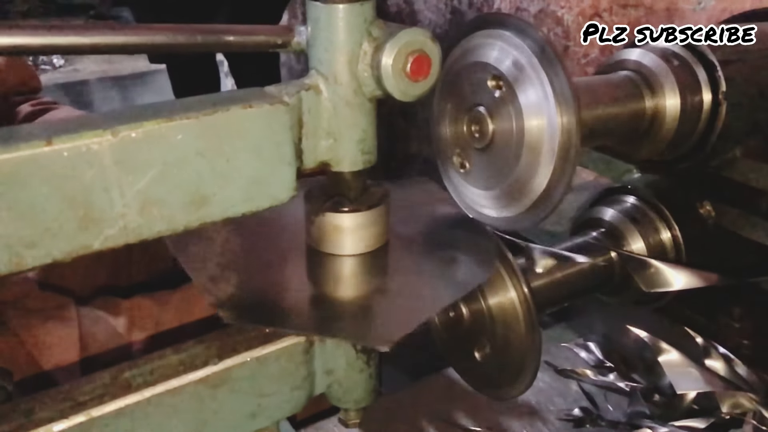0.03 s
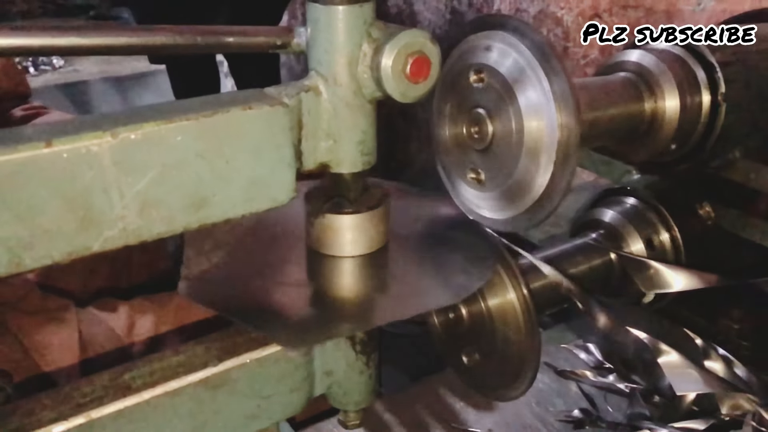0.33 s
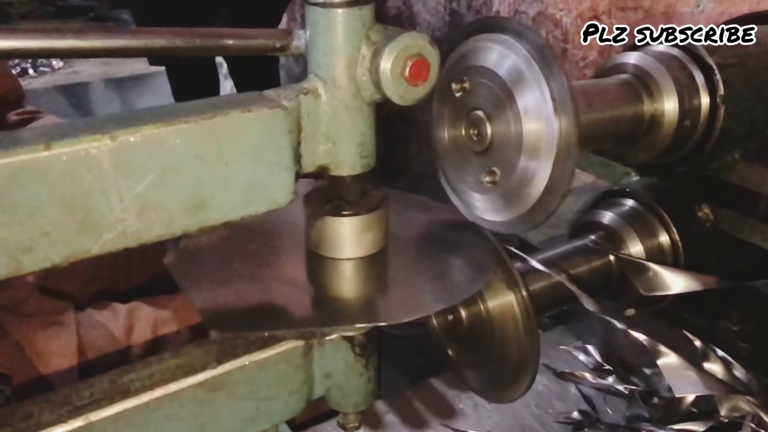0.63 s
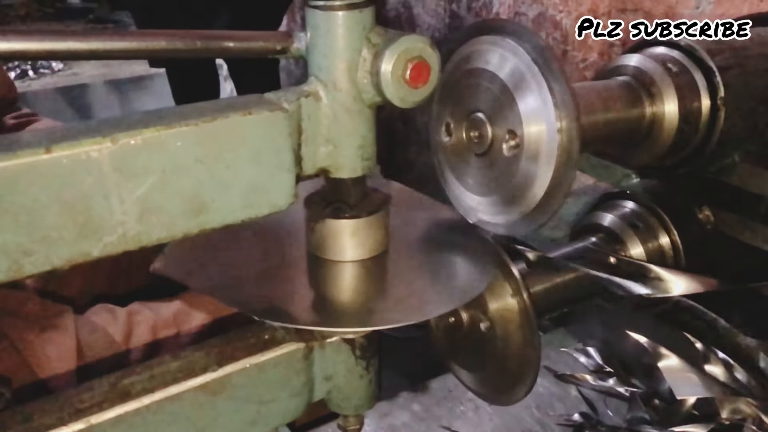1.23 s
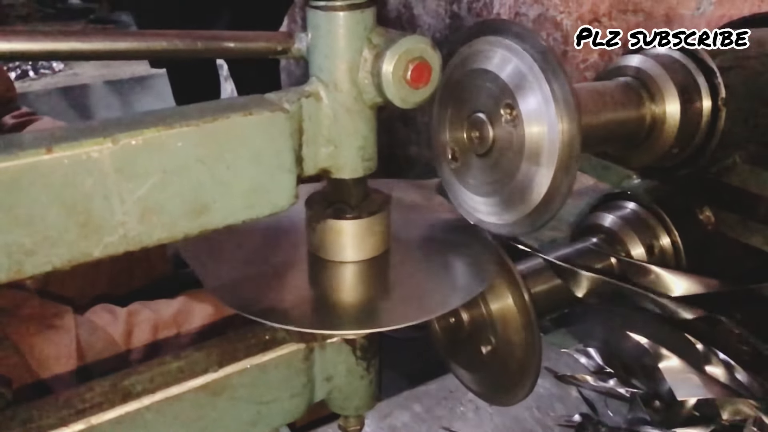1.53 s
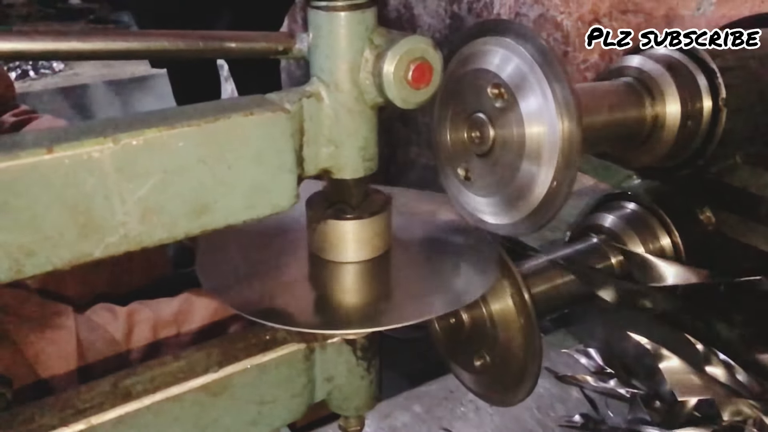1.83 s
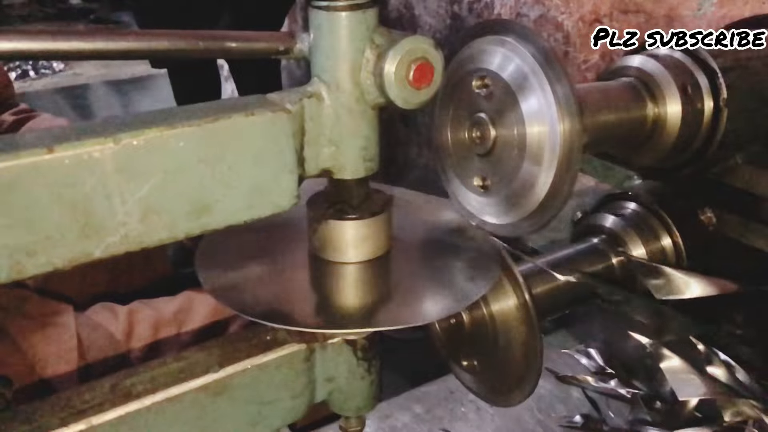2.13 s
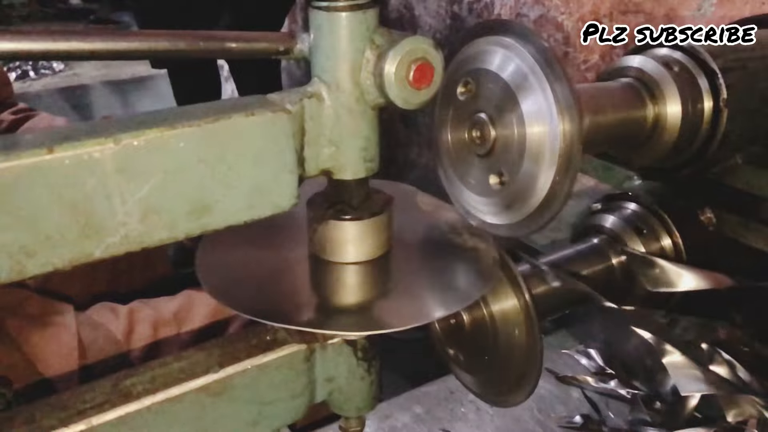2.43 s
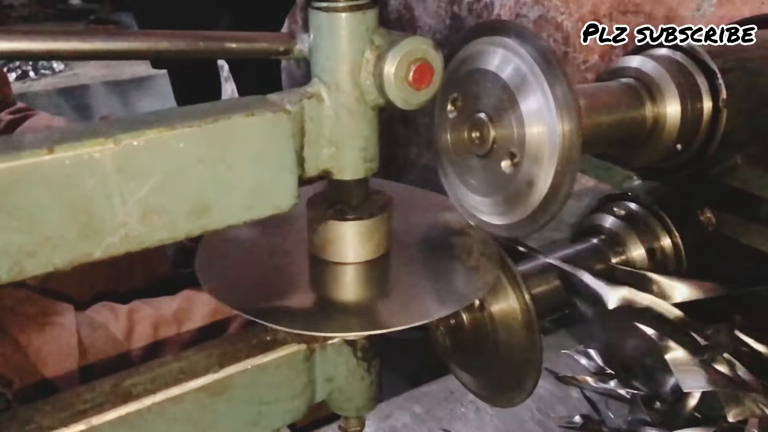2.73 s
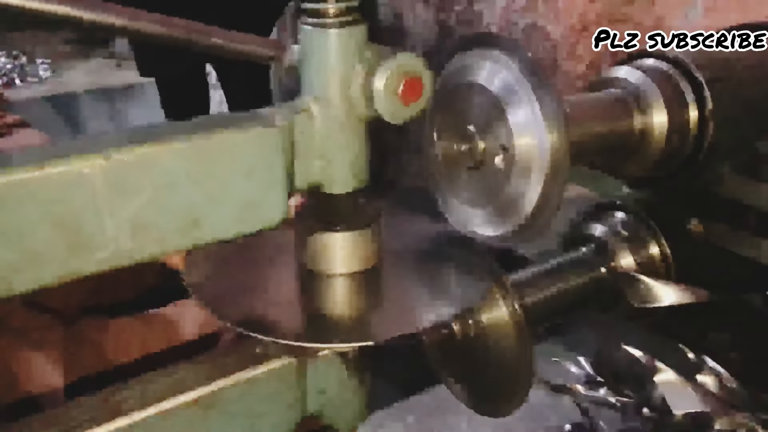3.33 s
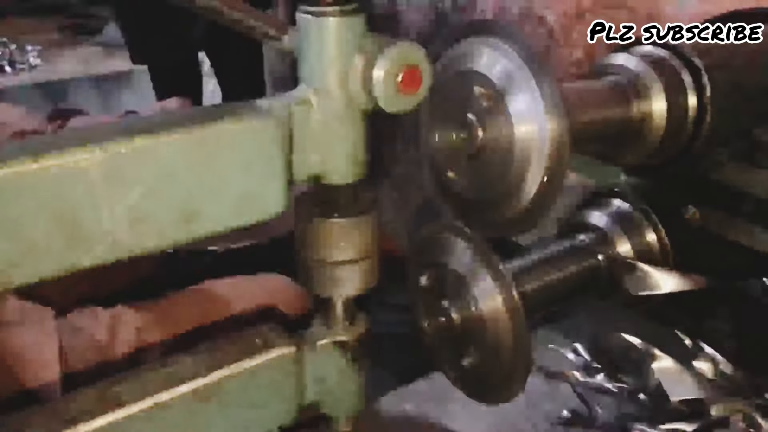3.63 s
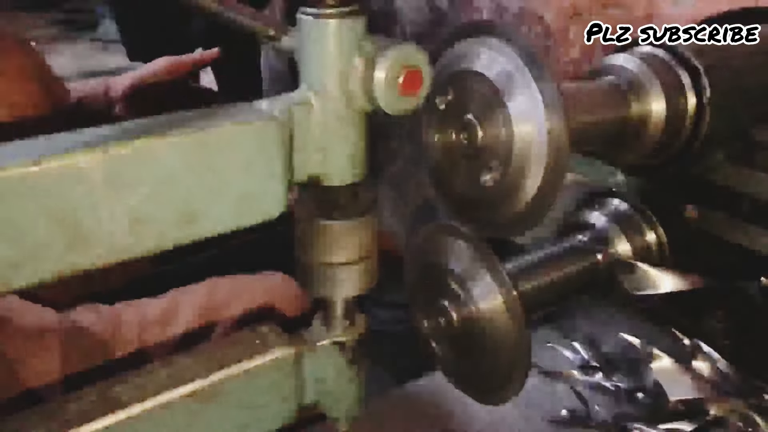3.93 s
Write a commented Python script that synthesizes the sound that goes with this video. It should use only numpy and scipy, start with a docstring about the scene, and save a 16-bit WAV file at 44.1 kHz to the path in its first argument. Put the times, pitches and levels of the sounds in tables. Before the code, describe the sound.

A metal cutting machine rumbles and groans softly in slow motion as the sheet cracks. Near the end it speeds up into a much louder rattling hum, with sharp metallic snaps, scrapes, knocks and a falling offcut.

```python
"""A deep, quiet rumble and groan come first: a rotary shear trims a sheet-metal disc in eightfold slow
motion, stepping up to full speed and level at about three seconds. The drive hums and a loose part
rattles; the sheet snaps, rings and scrapes between the chattering wheels; the disc knocks against its
clamp, and the offcut crashes on the scrap pile. Starts and level curves are in listening time; pitches,
lengths and decays are those at full speed. Levels in dB are relative."""
import sys
import numpy as np
from scipy import signal
from scipy.fft import rfft, irfft, next_fast_len
from scipy.io import wavfile
from scipy.ndimage import map_coordinates

SR = 44100
rng = np.random.default_rng(int(sys.argv[2]) if len(sys.argv) > 2 else 0)


def digitize_waveform(pressure):
    """Quantize a signal to 16-bit integers and store it at the path in sys.argv[1].

    Rows of a 2-D input are taken as channels; values are limited to [-1, 1].
    """
    field = np.atleast_2d(pressure).T
    bounded = np.clip(field, -1, 1)
    quanta = np.round(bounded * 32767).astype(np.int16)
    wavfile.write(sys.argv[1], SR, quanta)


N = 176400

# Snaps of the sheet. Each row: start in seconds, level in dB, decay in seconds, tilt in dB per octave,
# level of the ring in dB.
SNAPS = [(1.031, -32.5, 0.0034, -5.5, -5.5), (1.484, -29, 0.0014, 2.5, 2.5), (1.702, -29, 0.0026, 3.5, 1),
         (1.843, -32.5, 0.0013, -0.5, 0), (1.989, -37, .003, -2, -1), (2.085, -39, .002, 5.5, -6),
         (2.531, -45.5, .002, -2, -4), (3.015, -39, 0.011, -3.5, -3), (3.05, -40, .004, 0.5, 10),
         (3.067, -34.5, 0.0038, 1, 10), (3.089, -37.5, 0.0043, 1.5, -3), (3.198, -37, 0.0035, -2, -4),
         (3.223, -41.5, .006, 0, 0), (3.316, -38, 0.0073, -0.5, 0)]
SNAP_RISE_S, SNAP_TAIL_DB, SNAP_TAIL_S = 0.0011, -12, 0.017
# Scrapes of the cut edge. Each row: start and length in seconds, level in dB, tilt in dB per octave.
SCRAPES = [(1.584, .004, -47, -1.5), (1.662, 0.069, -39.5, -2), (2.459, 0.091, -48.5, -3.5),
           (3.028, 0.05, -38.5, 0), (3.205, 0.041, -38.5, 0.5), (3.324, .06, -44, 1),
           (3.406, 0.075, -53, -3), (3.497, .065, -41.5, 2.5), (3.933, 0.044, -46, -6)]
SCRAPE_RISE_S, SCRAPE_FADE_S, SCRAPE_GRIT_DB = 0.0049, 0.028, 1.5
# Knocks on the clamp. Each row: start in seconds, level in dB, pitch in Hz.
KNOCKS = [(3.086, -35.5, 616), (3.104, -30.5, 600), (3.544, -32.5, 555)]
KNOCK_RISE_S, KNOCK_DECAY_S = 0.0034, 0.014
# Modes of the clamped disc. Each row: multiple of the pitch, level in dB.
DISC_MODES = [(1, 1), (1.16, -12.5), (2.55, -10), (4.7, -22)]
# Motor hum and gear tones. Each row: frequency in Hz, level in dB.
DRIVE_TONES = [(64.6, -40), (204.6, -52.5), (247.6, -56), (549.1, -53.5), (699.8, -56.5), (985.1, -60)]

# Modes of struck metal. Each row: frequency in Hz, level in dB, time to fall 60 dB in seconds.
SHEET_MODES = [(5000, -26, 0.15), (6500, -22.5, 0.049), (9260, -30.5, .1), (10740, -25, 0.1),
               (13250, -16, 0.11), (15800, -17.5, .1)]
RATTLE_MODES = [(2714, -4, 0.037), (2883, 1, .03), (3060, -7.5, 0.022), (3396, -5, 0.06),
                (5980, -20, 0.047)]
# Resonances of scrap and frame. Each row: frequency in Hz, bandwidth in Hz, level in dB.
SCRAP_RINGS = [(694, 50, -14), (1867, 70, -23), (2093, 37, -14.5), (2676, 55, -13), (3910, 110, -13)]
FRAME_RINGS = [(501, 37, -48.5), (551, 36, -47), (644, 12, -56.5), (754.5, 14, -58.5), (817.4, 23, -57.5),
               (988, 14, -58), (1593, 41, -58.5), (1816, 13, -61), (2095, 52, -58), (2750, 16, -58.5),
               (2878, 38, -54.5), (3134, 22, -62.5), (5896, 44, -59.5)]

# Noise spectra of the sources. Each row: frequency in Hz, spectral density in dB.
SNAP_SPECTRUM = [(300, -28), (3000, -15.5), (5500, -6), (7000, -0.5), (11000, -4.5), (14000, 2.5),
                 (18000, 6.5)]
SCRAPE_SPECTRUM = [(500, -38), (3000, -17.5), (5000, 0), (7500, -2), (11000, -4), (13500, -3.5),
                   (15500, 3.5), (17500, 10), (18600, 5.5)]
GROAN_SPECTRUM = [(330, -36.5), (480, -4), (560, 0), (660, 0.5), (800, -3.5), (980, 0.5), (1250, -12),
                  (2000, -26.5), (6000, -50)]
CHATTER_SPECTRUM = [(1500, -35.5), (2600, -10.5), (3100, 1.5), (3700, -1), (4250, -0.5), (4600, -14),
                    (6000, -30.5), (12000, -50)]
CRASH_SPECTRUM = [(200, -18.5), (650, -12), (1000, -4), (2000, 2.5), (2700, -2), (3700, -2.5), (5500, -7),
                  (8000, -11), (12000, -15.5), (16000, -16.5)]
RATTLE_SPECTRUM = [(300, -31), (1200, -6.5), (2300, -10), (2900, -0.5), (3500, -5.5), (4500, -16.5),
                   (8000, -31.5), (18000, -42)]
FRAME_SPECTRUM = [(20, -22), (36, -21.5), (48, -12), (90, 1.5), (160, -5), (290, -3.5), (375, -20.5),
                  (470, -4.5), (570, -4.5), (780, -12), (1000, -13.5), (1250, -13), (2300, -16),
                  (3000, -15), (4000, -20), (5000, -27), (7000, -28.5), (11000, -36), (15000, -33.5),
                  (18000, -28.5)]

# Level curves of the sustained sounds. Each row: time in seconds, level in dB.
GROAN_LEVEL = [(0, -48.5), (.35, -48), (.6, -38.5), (1.0, -39.5), (1.35, -44.5), (1.55, -62), (2.0, -46.5),
               (2.3, -40), (2.75, -48.5), (3.0, -67), (3.3, -82)]
CHATTER_LEVEL = [(0, -46.5), (.15, -42), (.6, -47), (1.3, -49), (1.44, -41), (1.54, -59.5), (1.63, -45),
                 (1.75, -58.5), (2.3, -48), (2.7, -42.5), (2.85, -69), (3.1, -69.5)]
RATTLE_LEVEL = [(0, -2.5), (1.4, -2), (1.8, -0.5), (2.3, -3.5), (3.0, -5), (3.17, 1.5), (3.3, 0.5),
                (3.45, 4.5), (3.55, 3), (3.7, -3.5), (4, 0)]
TONES_LEVEL = [(0, -2), (1.4, 3), (1.9, -3), (2.6, -3), (3.1, -4), (3.3, 0), (3.6, 0.5), (3.69, -2.5),
               (3.78, 3), (4, 0)]
RINGS_LEVEL = [(0, -3), (1.4, -1.5), (1.9, -4), (2.4, -2.5), (2.9, -3), (3.15, 0), (3.55, -1), (3.7, 1.5),
               (4, -3)]
MACHINE_LEVEL = [(0, 1.5), (.6, 0), (1.0, -1), (1.3, -1.5), (1.48, 0.5), (1.55, -11), (1.63, 2),
                 (1.9, -4.5), (2.25, 1.5), (2.7, 0), (2.85, -3), (3.1, -2), (3.3, -3.5), (3.45, 0),
                 (3.6, 0.5), (3.67, -1.5), (3.8, -1), (4, 1.5)]  # drive and rattle together
SCENE_LEVEL = [(0, -13.5), (2.76, -12.5), (2.99, -11.5), (3.03, -7), (3.08, -3.5), (3.11, 1.5), (4, -1.5)]
# Steps out of slow motion. Each row: start in seconds, speed as a share of full speed.
SPEED_STEPS = [(0, .125), (2.762, .275), (2.866, .425), (2.942, .585), (2.99, .68), (3.016, 1)]

CHATTER_SWING_DB, CHATTER_S = 5, 0.0039
CRASH_AT_S, CRASH_DB, CRASH_GRIT_DB = 3.674, -37.5, 2
MOTOR_HZ, RATTLE_BEAT_AT_S, RATTLE_DECAY_S = 61.25, 3.446, 0.0029
RATTLE_DB, RATTLE_RING_DB, RATTLE_SPREAD_DB = -48, -51.5, 2
FRAME_DB, FRAME_FLUTTER_DB, FLUTTER_S = -38.5, 1, 0.007
TONE_WAVER, TONE_WAVER_S = 0.13, 0.045
ECHO_DB, ECHO_T60_S = -5.5, 0.059

NOW = np.arange(N) / SR  # listening time
STARTS, SPEEDS = np.transpose(SPEED_STEPS)
CLOCK = np.cumsum(SPEEDS[np.searchsorted(STARTS, NOW, "right") - 1]) / SR  # machine time at each moment
M = next_fast_len(int(CLOCK[-1] * SR) + 2048)
T = np.arange(M) / SR  # machine time


def snaps():
    """Impulsive excitation: each snap is a bright crack that sets the sheet's damped modes ringing."""
    out = np.zeros(M)
    for start, db, decay, tilt, ring_db in SNAPS:
        crack = envelope(start, SNAP_RISE_S, SNAP_RISE_S, decay)
        tail = amp(SNAP_TAIL_DB) * envelope(start, SNAP_RISE_S, 0, SNAP_TAIL_S)
        ring = sum(amp(mode_db) * sine(hz) * envelope(start, SNAP_RISE_S, 0, t60 / np.log(1000))
                   for hz, mode_db, t60 in SHEET_MODES)
        out += amp(db) * ((crack + tail) * noise(SNAP_SPECTRUM, tilt) + amp(ring_db) * ring)
    return out


def scrapes():
    """Sliding friction: the cut edge rubs the wheels with a gritty, very bright hiss."""
    hiss = np.zeros(M)
    for start, length, db, tilt in SCRAPES:
        contact = envelope(start, SCRAPE_RISE_S, length, SCRAPE_FADE_S)
        hiss += amp(db) * contact * noise(SCRAPE_SPECTRUM, tilt)
    grit = evened(amp(SCRAPE_GRIT_DB * drift(0.0022)))
    return hiss * grit


def groan():
    """Forced vibration: the sheet shudders under the cut in a band of noise."""
    return noise(GROAN_SPECTRUM) * level(GROAN_LEVEL)


def chatter():
    """Stick-slip friction: the wheels bite and slip on the sheet in uneven bursts."""
    bursts = noise(CHATTER_SPECTRUM) * amp(CHATTER_SWING_DB * np.tanh(drift(CHATTER_S)))
    return evened(bursts) * level(CHATTER_LEVEL)


def crash():
    """Impact and resonance: the offcut lands in a dense clatter, and the scrap rings."""
    clatter = evened(noise(CRASH_SPECTRUM) * amp(CRASH_GRIT_DB * drift(0.006)))
    ring = resonances(SCRAP_RINGS)
    return amp(CRASH_DB) * (clatter + ring) * envelope(CRASH_AT_S, rise=0.0023, hold=0.08, fade=0.077)


def knocks():
    """Damped free vibration: the disc strikes its clamp and rings briefly in inharmonic modes."""
    out = np.zeros(M)
    for start, db, hz in KNOCKS:
        ring = sum(amp(mode_db) * sine(hz * multiple) for multiple, mode_db in DISC_MODES)
        out += amp(db) * ring * envelope(start, KNOCK_RISE_S, KNOCK_RISE_S, KNOCK_DECAY_S)
    return out


def rattle():
    """Periodic impact: a loose part strikes once a motor turn, each blow a burst and a modal ring."""
    turns = since(RATTLE_BEAT_AT_S) * MOTOR_HZ
    turn = (np.floor(turns) - np.floor(turns[0])).astype(int)
    strength = amp(RATTLE_SPREAD_DB * rng.standard_normal(size=256))[turn]
    decay = np.exp(-(turns % 1) / MOTOR_HZ / RATTLE_DECAY_S)
    burst = evened(noise(RATTLE_SPECTRUM) * strength * decay)
    blows = np.diff(turn, prepend=0) * strength * rng.choice([-1, 1], M)
    response = sum(amp(db) * sine(hz) * np.exp(-np.log(1000) * T / t60) for hz, db, t60 in RATTLE_MODES)
    ring = evened(signal.fftconvolve(blows, response)[:M])
    return (amp(RATTLE_DB) * burst + amp(RATTLE_RING_DB) * ring) * level(RATTLE_LEVEL)


def drive():
    """Forced vibration: motor and gears hum and keep the frame rumbling and ringing."""
    rumble = amp(FRAME_DB) * evened(noise(FRAME_SPECTRUM) * amp(FRAME_FLUTTER_DB * drift(FLUTTER_S)))
    tones = np.zeros(M)
    for hz, db in DRIVE_TONES:
        waver = 1 + TONE_WAVER * (drift(TONE_WAVER_S) + 1j * drift(TONE_WAVER_S))  # amplitude and phase
        carrier = np.exp(2j * np.pi * (hz * T + rng.random()))
        tones += amp(db) * evened((waver * carrier).real)
    return rumble + resonances(FRAME_RINGS) * level(RINGS_LEVEL) + tones * level(TONES_LEVEL)


def reflected(x):
    """Reflection: the steel around the wheels adds dense, short echoes."""
    tail = rng.standard_normal(M) * np.exp(-np.log(1000) * T / ECHO_T60_S)
    return x + amp(ECHO_DB) * signal.fftconvolve(x, tail / np.linalg.norm(tail))[:M]


def slow_motion(x, oversample=4, cutoff_hz=18600):
    """Time scaling: stretching the band-limited sound lowers every frequency in proportion."""
    passband = np.fft.rfftfreq(M, 1 / SR) < cutoff_hz
    fine = oversample * irfft(rfft(x) * passband, M * oversample)
    return map_coordinates(fine, [CLOCK * SR * oversample], order=3)


def resonances(rows):
    """Resonance: narrow filters ring under random excitation."""
    out = np.zeros(M)
    for hz, width, db in rows:
        resonator = signal.iirpeak(hz, hz / width, SR)
        out += amp(db) * evened(signal.lfilter(*resonator, rng.standard_normal(M)))
    return out


def noise(spectrum, tilt=0):
    """Spectral shaping: noise of a given spectrum, tilted in dB per octave."""
    octaves = np.log2(np.fft.rfftfreq(M, 1 / SR) + 1)
    hz, db = np.transpose(spectrum)
    gain = amp(np.interp(octaves, np.log2(hz), db) + tilt * octaves)
    return evened(irfft(rfft(rng.standard_normal(M)) * gain, M))


def drift(span):
    """Random modulation of rms 1 that changes on a scale of span seconds."""
    lowpass = np.exp(-(np.fft.rfftfreq(M, 1 / SR) * span) ** 2)
    return evened(irfft(rfft(rng.standard_normal(M)) * lowpass, M))


def envelope(start, rise, hold, fade):
    """Linear rise, then exponential decay from hold seconds after the start."""
    age = since(start)
    return np.clip(age / rise, 0, 1) * np.exp(-np.clip((age - hold) / fade, 0, 50))


def sine(hz):
    """Simple harmonic motion of random phase."""
    return np.sin(2 * np.pi * (hz * T + rng.random()))


def level(points):
    """A level curve as gain over machine time."""
    times, db = np.transpose(points)
    return amp(np.interp(np.interp(T, CLOCK, NOW), times, db))


def since(start):
    """Machine time elapsed since a start in listening time."""
    return T - np.interp(start, NOW, CLOCK)


def amp(db):
    """Decibels to amplitude ratio."""
    return 10 ** (np.asarray(db) / 20)


def evened(x):
    """Normalisation to rms 1."""
    return x / np.sqrt(np.mean(abs(x) ** 2) + 1e-20)


def scene():
    """Superposition: the running machine and the metal in it add, slowed at first."""
    machine = (drive() + rattle()) * level(MACHINE_LEVEL)
    metal = groan() + chatter() + knocks() + snaps() + reflected(scrapes() + crash())
    return slow_motion((machine + metal) * level(SCENE_LEVEL))[None]


def record(dry):
    """Band limiting: a low-pass filter removes the treble above 15.9 kHz."""
    lowpass = signal.firwin(511, 15900, window=("kaiser", 9), fs=SR)
    return signal.oaconvolve(dry, lowpass[None], "same")


dry = scene()
out = record(dry)
digitize_waveform(out)
```